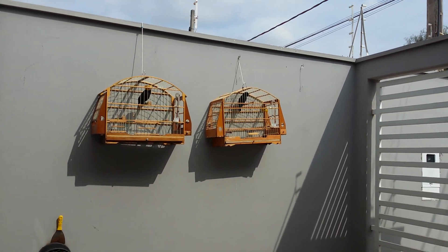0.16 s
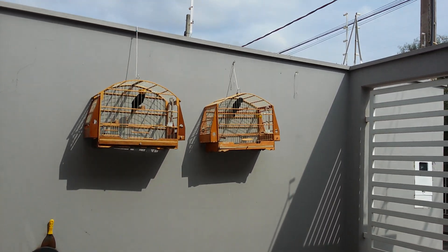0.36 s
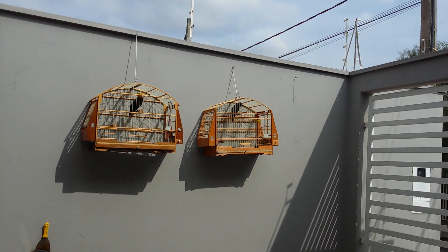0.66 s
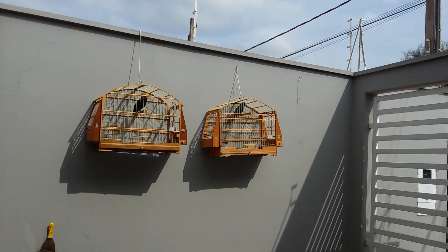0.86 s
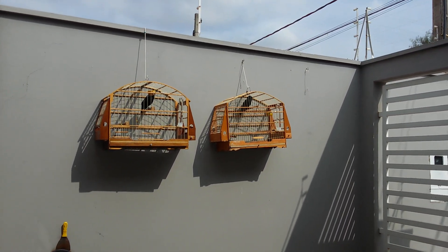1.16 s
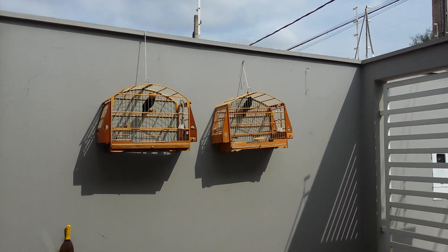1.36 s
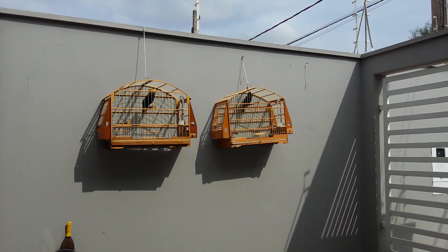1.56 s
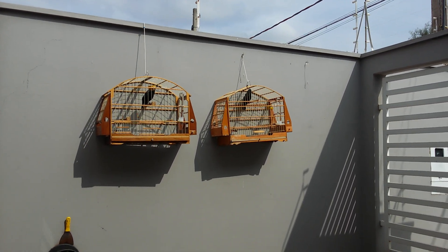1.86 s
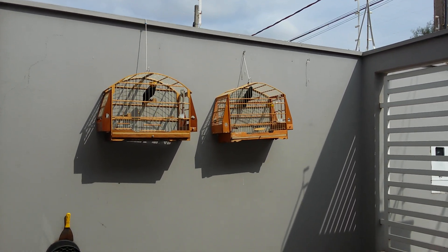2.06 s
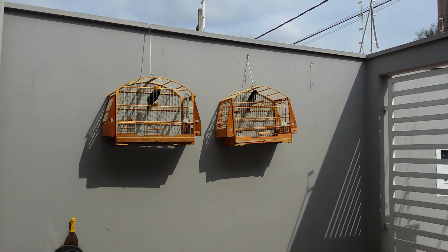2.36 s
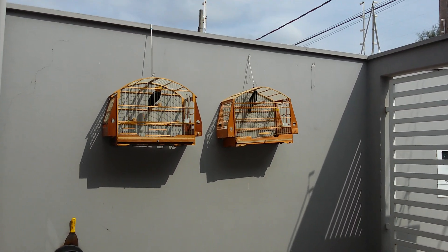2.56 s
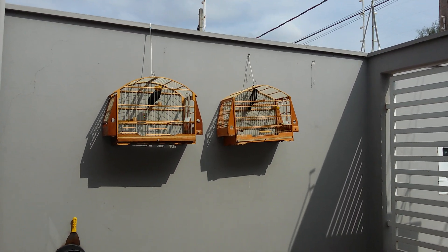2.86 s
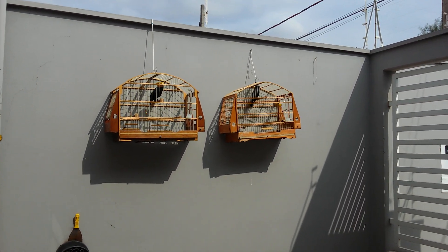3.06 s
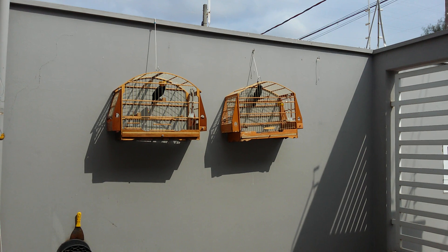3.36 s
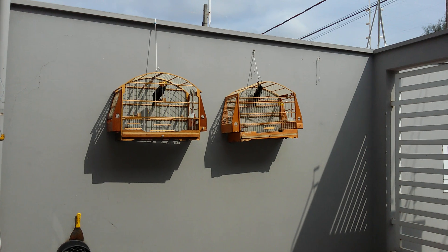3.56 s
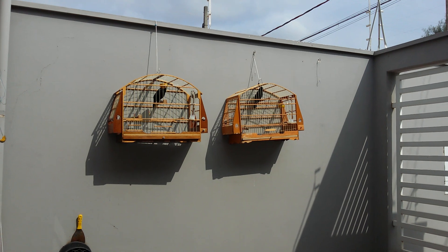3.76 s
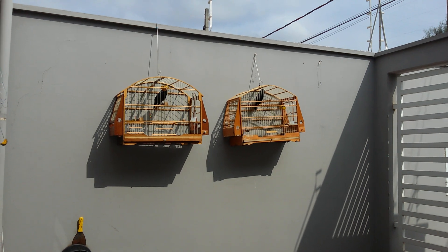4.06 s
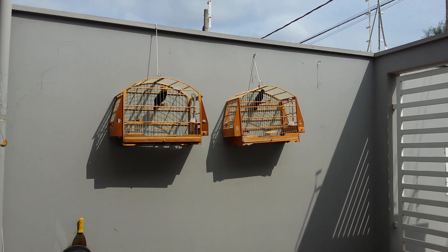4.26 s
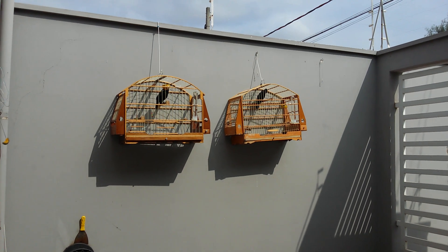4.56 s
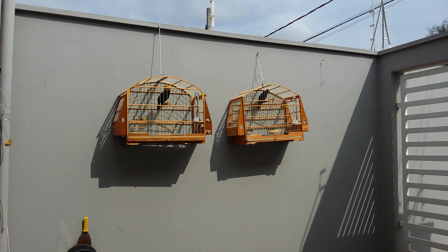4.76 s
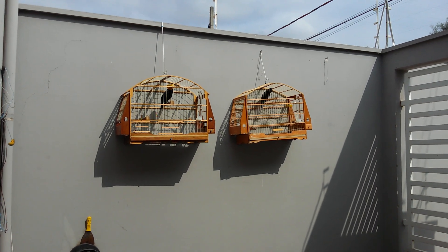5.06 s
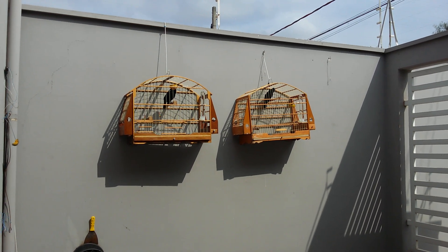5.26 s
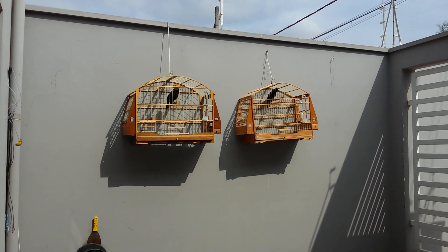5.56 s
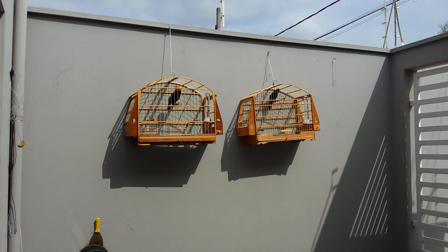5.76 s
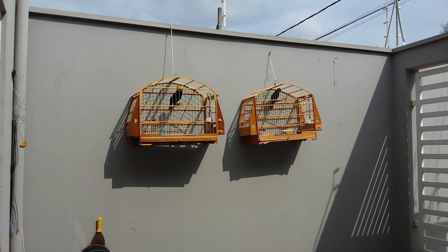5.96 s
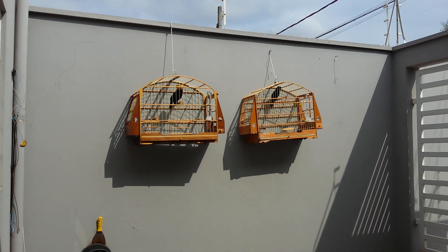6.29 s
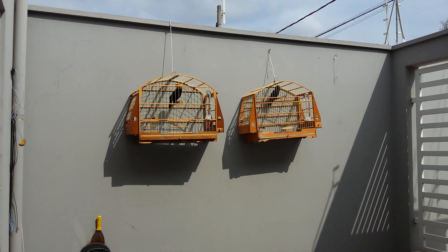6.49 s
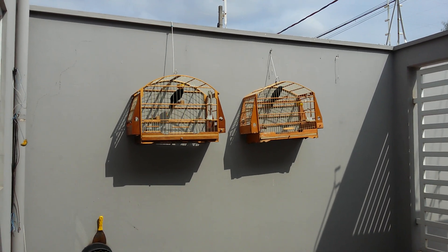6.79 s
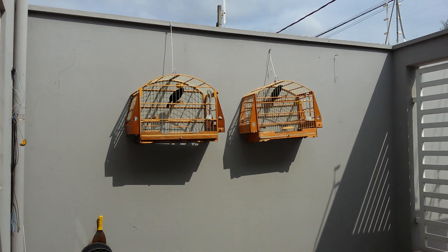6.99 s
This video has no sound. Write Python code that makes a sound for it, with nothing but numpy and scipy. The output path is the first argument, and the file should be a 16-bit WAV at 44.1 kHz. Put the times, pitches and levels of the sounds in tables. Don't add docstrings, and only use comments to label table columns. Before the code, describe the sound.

Piercing whistles, buzzy rasps and rapid trills from two caged birds ring off bare courtyard walls, with low distant traffic and hum beneath.

```python
import sys
import numpy as np
from scipy import signal
from scipy.io import wavfile
from scipy.ndimage import uniform_filter1d, minimum_filter1d

SR = 44100
rng = np.random.default_rng(int(sys.argv[2]) if len(sys.argv) > 2 else 0)


def magnitude_from_level(level_db):
    exponent = np.asarray(level_db, float) / 20
    return 10 ** exponent


def wav_out(sig):
    wavfile.write(sys.argv[1], SR, np.round(np.clip(np.atleast_2d(sig).T, -1, 1) * 32767).astype(np.int16))


N = 314433
LEAD_IN = SR // 5


def rms_one(x):
    return x / np.sqrt(np.mean(x ** 2) + 1e-20)


def at_hz(points, hz):
    f_hz, value = np.array(points)[:, :2].T
    return np.interp(np.log(hz), np.log(f_hz), value)


def wobble(size, hz):
    knots = rng.standard_normal(200)
    return np.interp(np.arange(size) * hz / SR, np.arange(200), knots)


def silence():
    return np.zeros((4, LEAD_IN + N))


def add(track, start_s, sound, pan_db, facing_db=0):
    from_end = np.minimum(np.arange(len(sound)), np.arange(len(sound))[::-1])
    ramp = np.minimum(from_end / (0.0012 * SR), 1)
    start = LEAD_IN + round(start_s * SR)
    gains_db = np.array([[1], [-1], [1], [-1]]) * pan_db / 2 + np.array([[1], [1], [0], [0]]) * facing_db
    piece = (sound * ramp * magnitude_from_level(gains_db))[:, :track.shape[1] - start]
    track[:, start:start + piece.shape[1]] += piece


def whistles(notes, colours, manners):
    # f/Hz, gain/dB
    beak = [(2500, 8), (4200, -3), (5800, 2), (7800, -9), (9000, -3), (10600, -9), (12800, 2), (16000, -9)]
    track = silence()
    for note, (*overtones_db, pan_db), (facing_db, hoarse) in zip(notes, colours, manners):
        s, hz, level_db = np.transpose(note)
        t = np.arange(s[0], s[-1], 1 / SR)
        roughness = hoarse * np.linspace(.1, 1, len(t)) ** 3 * wobble(len(t), hz=491.3)
        pitch = np.interp(t, s, hz) * (1 + roughness)
        turn = 2 * np.pi * np.cumsum(pitch) / SR
        level_db = np.interp(t, s, level_db)
        effort_db = 0.27 * (level_db - level_db.max()) + 8 * np.log2(pitch / pitch.max())
        tone = np.sin(turn) * (pitch < .45 * SR)
        for k, db in enumerate(overtones_db, 2):
            gain = magnitude_from_level(db + effort_db + at_hz(beak, k * pitch))
            tone = tone + gain * np.sin(k * turn) * (k * pitch < .45 * SR)
        add(track, s[0], np.sqrt(2) * magnitude_from_level(level_db) * tone, pan_db, facing_db)
    return track


def sing(notes):
    orders_db = (-20, -26, -35, -39, -43, -44)
    # f/Hz, left-right/dB
    ports = [(1400, -6), (2000, -11), (2700, -3), (3800, 2), (5500, 3)]
    # f/Hz, gain/dB
    beam = [(1400, .5), (2000, 4), (2800, -6), (3900, 1.5), (4700, 3), (5700, 0.5)]
    bright_db, hoarse, curves = zip(*notes)
    tops_hz = [np.max(np.array(curve)[:, 1]) for curve in curves]
    colours = [(*(db + np.array(orders_db)), at_hz(ports, hz)) for db, hz in zip(bright_db, tops_hz)]
    manners = [(at_hz(beam, hz), rough) for hz, rough in zip(tops_hz, hoarse)]
    return whistles(curves, colours, manners)


def hooks(rows, bright_db, scoop_s, start, reached, held, fall_s, dip_db, loss_db, early):
    notes = []
    for s, hold_s, top_hz, end_hz, db in rows:
        start_hz = max(start * top_hz, min(4000, .88 * top_hz))
        curve = [(s, start_hz, db - 18),
                 (s + min(scoop_s, hold_s), reached * top_hz, db),
                 (s + hold_s, held * top_hz, db + dip_db),
                 (s + hold_s + .35 * fall_s, top_hz + early * (end_hz - top_hz), db - 1.5),
                 (s + hold_s + fall_s, end_hz, db + loss_db)]
        notes.append((bright_db, .03, curve))
    return notes


def first_perch_whistles():
    # t/s, hold/s, top/Hz, end/Hz, level/dB
    mid_hooks = [
        (.461, .029, 3660, 1905, -9),
        (1.293, .017, 3240, 1970, -17),
        (2.688, .034, 3120, 2100, -15),
    ]
    high_hooks = [
        (5.353, .036, 5030, 2500, -16),
        (5.79, .022, 5800, 2700, -17),
    ]
    # (t/s, f/Hz, level/dB)
    climbing = [
        (-2, 0, [(.672, 3540, -35), (.68, 4100, 1.5), (.72, 4520, -12), (.755, 4680, -15), (.78, 4000, -15), (.8, 3600, -19)]),
        (5, .02, [(1.712, 1970, -32), (1.75, 2710, -19), (1.78, 2950, -21), (1.868, 2790, -27)]),
        (-2, 0, [(3.068, 3400, -34), (3.084, 3600, -19), (3.106, 3680, -12), (3.16, 3840, -15), (3.194, 3937, -5), (3.245, 3999, -16)]),
        (2, .02, [(3.56, 3540, -36), (3.568, 3546, -21), (3.638, 3569, -18), (3.7, 3830, -20), (3.72, 3560, -55)]),
        (0, .01, [(6.42, 3440, -33), (6.43, 3465, -25), (6.5, 3672, -19)]),
    ]
    sinking = [
        (-6, .01, [(-.03, 1600, -34), (.046, 1500, -33), (.098, 1250, -32), (.12, 1054, -48)]),
        (1.5, .03, [(2.235, 2640, -39), (2.283, 2688, -13), (2.307, 2565, -12), (2.411, 2297, -19.5), (2.42, 2300, -27)]),
        (-2.5, .015, [(4.842, 2510, -27), (4.86, 2908, -18), (5.02, 2420, -14.5), (5.1, 2240, -21), (5.15, 2074, -15), (5.19, 1806, -28), (5.22, 1216, -42)]),
        (7, .2, [(6.412, 3990, -36), (6.44, 3930, -23), (6.47, 3850, -13), (6.538, 3599, -18), (6.574, 3014, -16), (6.62, 2200, -25)]),
        (-12, .04, [(6.86, 1900, -33), (6.882, 2052, -30), (6.968, 2000, -22), (7.07, 1903, -29), (7.13, 1900, -26)]),
    ]
    notes = hooks(mid_hooks, bright_db=1.5, scoop_s=.007, start=.95, reached=1.0, held=.975,
                  fall_s=.042, dip_db=-9, loss_db=-8, early=.47)
    notes += hooks(high_hooks, bright_db=-.8, scoop_s=.009, start=.7, reached=.96, held=1.0,
                   fall_s=.043, dip_db=-4, loss_db=-7, early=.3)
    return sing([*notes, *climbing, *sinking])


def trill(syllables, shape, jitter, facing_db, low_db):
    # multiple of the pitch, level/dB
    syllable_lines = [(.5, -25.5), (1, -11), (1.5, 2), (2, 2), (2.5, -10.5), (3, -9), (3.5, -13), (4, -26),
                      (4.5, -43), (5, -30.5), (5.5, -41.5), (6, -40.5), (7, -38), (8, -40)]
    track = silence()
    s, ratio, swell_db, half_db = np.transpose(shape)
    t = np.arange(0, s[-1], 1 / SR)
    half = magnitude_from_level(np.interp(t, s, half_db))
    for start_s, hz, level_db in syllables:
        pitch = hz * np.interp(t, s, ratio) * (1 + jitter * wobble(len(t), hz=412))
        half_turn = np.pi * np.cumsum(pitch) / SR
        call = 0
        for k, db in syllable_lines:
            order = round(2 * k)
            gain = magnitude_from_level(db + low_db * (k < 1.2)) * (half if order % 2 else 1)
            call = call + gain * np.sin(order * half_turn + k * k)
        swell = magnitude_from_level(level_db + 2.5 + np.interp(t, s, swell_db))
        add(track, start_s, swell * call, pan_db=0.5, facing_db=facing_db)
    return track


def run_of(count, bend, start_s, period_s, hz, sag_hz, level_db, fade_db):
    spent = (np.arange(count) / (count - 1)) ** bend
    return np.c_[start_s + period_s * np.arange(count), hz - sag_hz * spent, level_db + fade_db * spent ** 3]


def rattle():
    # t/s, pitch ratio, level/dB, half-pitch share/dB
    rattle_shape = [(0, 0.92, 1.5, -23), (.02, 1.034, -4, -0.5), (0.033, .99, -4.5, -10.5),
                    (.052, 0.77, -3.5, -7.5)]
    run = run_of(9, bend=4.0, start_s=-.11, period_s=.0597, hz=1860, sag_hz=240, level_db=-19, fade_db=-4)
    return trill(run, rattle_shape, jitter=0.04, facing_db=-5, low_db=1.5)


def chip():
    # t/s, f/Hz, level/dB
    chip_call = [
        (6.787, 2040, -22),
    ]
    # t/s, pitch ratio, level/dB, half-pitch share/dB
    chip_shape = [(0, 1.0, -8, -40), (.012, 1.005, 2, -40), (.016, 1.07, -8, -30), (.04, .8, -18, -25)]
    return trill(chip_call, chip_shape, jitter=.004, facing_db=7, low_db=1.5)


def closing_trill():
    # t/s, pitch ratio, level/dB, half-pitch share/dB
    trill_shape = [(0, 1.01, -5, -35), (.011, .99, 0, -30), (.014, .93, -3, -6), (.028, .89, -7, -3)]
    run = run_of(5, bend=.7, start_s=6.859, period_s=.063, hz=1920, sag_hz=260, level_db=-22, fade_db=-5)
    return trill(run, trill_shape, jitter=.028, facing_db=3, low_db=-3)


def squeaks():
    # t/s, length/s, start/Hz, end/Hz, level/dB
    squeak_rows = [
        (.45, .016, 6300, 5070, -20),
        (1.276, .014, 5990, 4140, -27),
        (2.705, .025, 3450, 3990, -41),
        (3.053, .015, 4300, 5080, -34),
        (4.843, .016, 4700, 3800, -40),
        (5.349, .022, 3150, 3430, -24),
    ]
    swell_db = np.array([-25, -5, 0])
    notes = []
    for s, length_s, start_hz, end_hz, db in squeak_rows:
        glide = np.linspace([s, start_hz], [s + length_s, end_hz], len(swell_db))
        notes.append((-3, .01, np.c_[glide, db + swell_db]))
    return notes


def reply_whistles():
    # t/s, hold/s, top/Hz, end/Hz, level/dB
    low_hooks = [
        (1.53, .012, 1370, 1000, -43),
        (2.02, .008, 1340, 900, -29),
        (4.51, .075, 1540, 1050, -38),
        (5.625, .066, 1490, 1000, -33),
        (6.56, .03, 1375, 1080, -45),
        (6.88, .012, 1250, 950, -50),
        (6.94, .012, 1200, 950, -50),
    ]
    notes = hooks(low_hooks, bright_db=1.5, scoop_s=.018, start=.82, reached=.98, held=.99,
                  fall_s=.03, dip_db=-5, loss_db=-21, early=.35)
    return sing(notes + squeaks())


def buzz(pitch, throat_hz, width_hz, half_db, skirt_db, top_hz, jitter):
    half_turn = np.pi * np.cumsum(pitch * (1 + jitter * wobble(len(pitch), hz=711))) / SR
    k = np.arange(1, 110)[:, None]
    hz = k * pitch / 2
    throat = 1 / (1 + ((hz - throat_hz) / width_hz) ** 2) + magnitude_from_level(skirt_db) / (1 + (hz / top_hz) ** 4)
    throat = throat / (1 + (950 / hz) ** 8)
    alternation = np.where(k % 2, magnitude_from_level(half_db), 1)
    return rms_one(np.sum(throat * (hz < 16000) * alternation * np.cos(k * half_turn), axis=0))


def harsh(calls, width_hz, half_db, skirt_db, top_hz, jitter, pan_db):
    track = silence()
    for s, length_s, pulse_hz, start_hz, end_hz, level_db in calls:
        u = np.linspace(0, 1, round(length_s * SR))
        pitch = pulse_hz * (1 + 0.051 * (.5 - u))
        throat_hz = start_hz + u * (end_hz - start_hz)
        call = buzz(pitch, throat_hz, width_hz, half_db, skirt_db, top_hz, jitter)
        add(track, s, magnitude_from_level(level_db) * np.sin(np.pi * u) ** 0.2 * call, pan_db)
    return track


def chucks():
    # t/s, length/s, pulse/Hz, throat start/Hz, throat end/Hz, level/dB
    chuck_calls = [
        (.845, 0.034, 632, 2410, 2380, -25.5),
        (2.82, 0.057, 624.7, 2050, 2020, -22),
        (3.32, .06, 638.6, 2040, 2040, -24.5),
        (3.79, 0.061, 633, 2250, 2230, -24.5),
    ]
    return harsh(chuck_calls, width_hz=410, half_db=-4.5, skirt_db=-26, top_hz=5500, jitter=0.051,
                 pan_db=-3.5)


def rasps():
    # t/s, length/s, pulse/Hz, throat start/Hz, throat end/Hz, level/dB
    rasp_calls = [
        (.978, .13, 262.2, 3700, 3040, -21.5),
        (1.618, 0.088, 327.5, 2360, 1270, -33),
    ]
    return harsh(rasp_calls, width_hz=340, half_db=-16.5, skirt_db=-30.5, top_hz=8350, jitter=.12,
                 pan_db=-0.5)


def ticks():
    # t/s, f/Hz, peak level/dB
    claw_ticks = [
        (1.497, 6000, -39),
        (3.9, 1000, -45.5),
        (5.5, 3500, -41),
        (6.363, 270, -39),
        (6.378, 7000, -52),
        (1.862, 4000, -42),
    ]
    track, t = silence(), np.arange(round(.012 * SR)) / SR
    for s, hz, peak_db in claw_ticks:
        after_s = np.maximum(t - .004, 0)
        click = magnitude_from_level(peak_db - 22 * hz * after_s) * np.sin(2 * np.pi * hz * after_s)
        add(track, s - .004, click, pan_db=1)
    return track


def far_birds():
    # t/s, length/s, start/Hz, end/Hz, level/dB
    far_calls = [
        (5.5, .25, 545, 560, -60),
        (4.7, .05, 5200, 5600, -60),
        (4.74, .07, 4400, 4000, -60),
        (5.96, .25, 740, 790, -56),
    ]
    track = silence()
    for s, length_s, start_hz, end_hz, level_db in far_calls:
        pitch = np.linspace(start_hz, end_hz, round(length_s * SR))
        add(track, s, magnitude_from_level(level_db) * np.sin(2 * np.pi * np.cumsum(pitch) / SR), pan_db=6)
    return track


def courtyard(track, wet_db, early_db, left_lag):
    # f/Hz, t60/s
    yard = [(1000, 0.65), (2600, 0.6), (6000, 0.52), (13000, 0.39)]
    t = np.arange(round(.9 * SR)) / SR
    shared, own = rng.standard_normal(len(t)), rng.standard_normal((2, len(t)))
    noise = .5 * shared + own
    edges_hz = 500 * 2 ** np.arange(0, 5.5, .5)
    tail = 0
    for low, high in zip(edges_hz, edges_hz[1:]):
        band = signal.sosfilt(signal.butter(2, [low, high], "band", fs=SR, output="sos"), noise)
        tail = tail + band * magnitude_from_level(-60 * t / at_hz(yard, np.sqrt(low * high)))
    tail = tail * np.clip(t / .012, 0, 1)
    response = magnitude_from_level(wet_db) * tail / np.sqrt(np.sum(tail ** 2) / 2)
    echoes = (rng.uniform(.0005, .012, 10) * SR).astype(int)
    echo_gains = magnitude_from_level(early_db + rng.normal(0, 5.2, (2, 10)))
    response[:, echoes] += echo_gains * rng.choice([-1, 1], (2, 10))
    direct = np.array([np.roll(track[0], left_lag), track[1]])
    walls = signal.fftconvolve(track[2:], response, axes=1)[:, :track.shape[1]]
    return (direct + walls)[:, LEAD_IN:]


def town():
    # f/Hz, density/dB per Hz
    town_spectrum = [(18, -45), (30, -24), (66, -4), (120, -6), (182, -3.5), (219, -6), (467, -11.5),
                     (575, -12.5), (767, -10), (1330, -23), (1870, -1), (2690, -8), (3980, -5.5),
                     (8280, -26.5), (15500, -31.5)]
    # t/s, level/dB
    traffic = [(0.0, -56), (0.8, -52), (1.15, -66), (2.1, -57), (4.55, -57), (4.7, -54), (7.13, -54)]
    # f/Hz, left-right likeness
    likeness = [(60, 1), (240, 0.8), (950, 0.66), (3770, -0.13), (15000, 0.3)]
    edges_hz = 28 * 2 ** np.arange(0, 9.3, 1 / 3)
    s, traffic_db = np.transpose(traffic)
    swell = magnitude_from_level(np.interp(np.arange(N) / SR, s, traffic_db) - np.mean(traffic_db))
    white = rng.standard_normal((2, 2, N))
    out = 0
    for k, (low, high) in enumerate(zip(edges_hz, edges_hz[1:])):
        band = signal.butter(2, [low, high], "band", fs=SR, output="sos")
        mid, side = signal.sosfilt(band, white[k % 2])
        centre_hz = np.sqrt(low * high)
        alike = np.clip(at_hz(likeness, centre_hz), 0, 1)
        gain = magnitude_from_level(at_hz(town_spectrum, centre_hz)) * (swell if 90 < low < 1100 else 1)
        out = out + gain * (np.sqrt(1 + alike) * mid + np.sqrt(1 - alike) * side * [[1], [-1]])
    return magnitude_from_level(-46.5) * rms_one(out)


def motor_drone():
    hz, width_hz, level_db = 223.5, 4.7, -61
    resonance = signal.iirpeak(hz, hz / width_hz, fs=SR)
    return magnitude_from_level(level_db) * rms_one(signal.lfilter(*resonance, rng.standard_normal(N)))


def thud():
    # t/s, length/s, f/Hz, level/dB
    bumps = [
        (.594, 0.1, 226, -30.5),
    ]
    track = silence()
    for s, length_s, hz, level_db in bumps:
        t = np.arange(round(length_s * SR)) / SR
        shake = np.sin(np.pi * t / length_s) * magnitude_from_level(2.8 * wobble(len(t), hz=130))
        tone = np.sin(2 * np.pi * hz * t + 1.35 * wobble(len(t), hz=83.3))
        add(track, s, magnitude_from_level(level_db) * shake * tone, pan_db=3.0)
    return track[:2, LEAD_IN:]


def scene():
    lead = magnitude_from_level(3) * first_perch_whistles() + rattle() + chip() + closing_trill()
    reply = magnitude_from_level(4) * reply_whistles() + chucks() + rasps() + ticks() + far_birds()
    birds = courtyard(lead, wet_db=0, early_db=-11, left_lag=-4)
    birds += courtyard(reply, wet_db=0.12, early_db=-12, left_lag=-8)
    return birds + town() + motor_drone() + thud()


def top_cut(x):
    return signal.sosfilt(signal.butter(12, 15770, fs=SR, output="sos"), x)


def record(dry):
    heard = signal.sosfilt(signal.butter(3, 45, "high", fs=SR, output="sos"), dry)
    peak = -minimum_filter1d(-np.abs(heard).max(axis=0), size=441)
    peak_db = 20 * np.log10(peak + 1e-6)
    cut_db = 0.16 * np.maximum(peak_db + 8.5, 0)
    cut_db = np.maximum(cut_db, peak_db + .6)
    mix = heard * magnitude_from_level(-uniform_filter1d(cut_db, size=441))
    return top_cut(mix)


dry = scene()
out = record(dry)
wav_out(out)
```